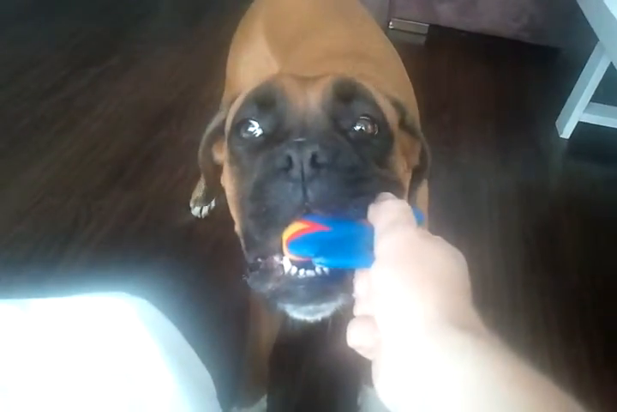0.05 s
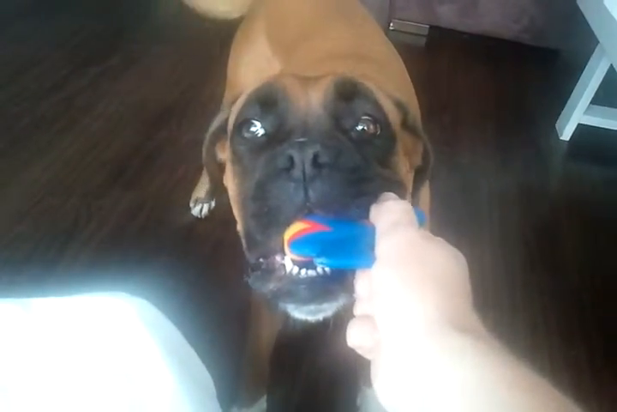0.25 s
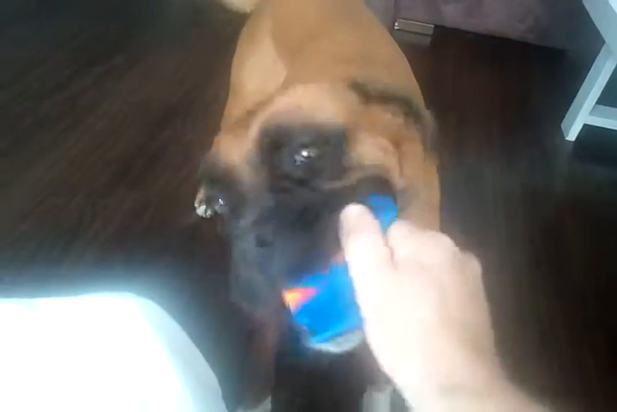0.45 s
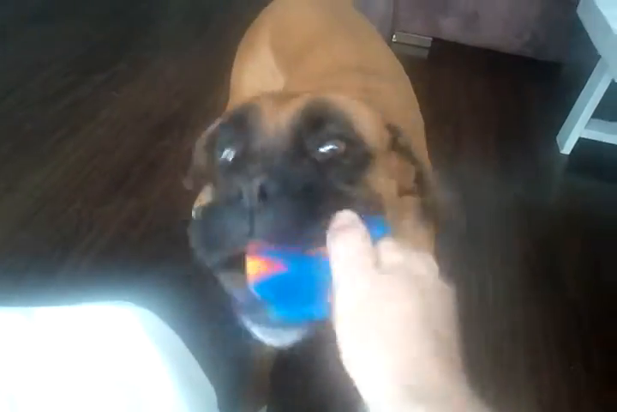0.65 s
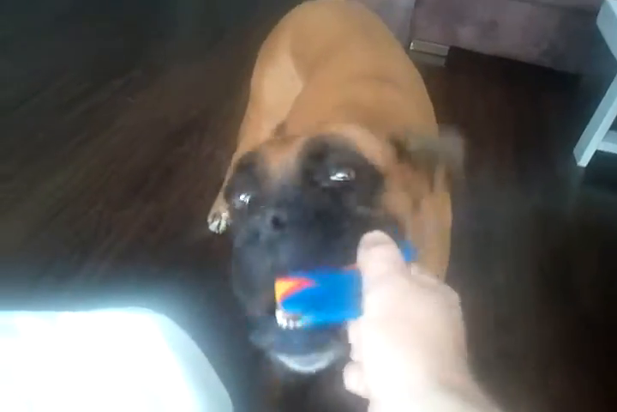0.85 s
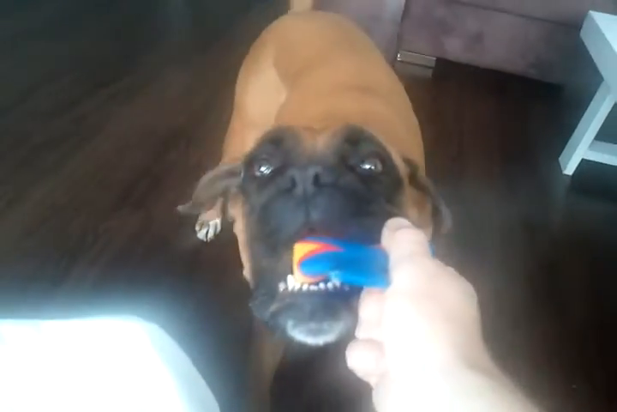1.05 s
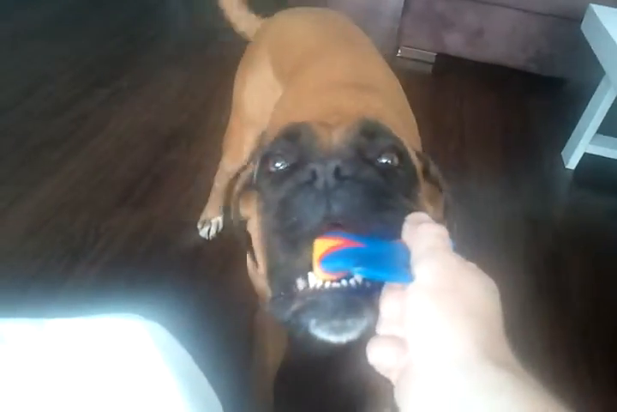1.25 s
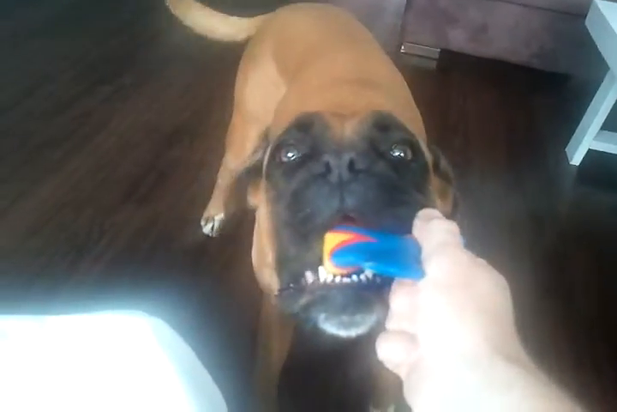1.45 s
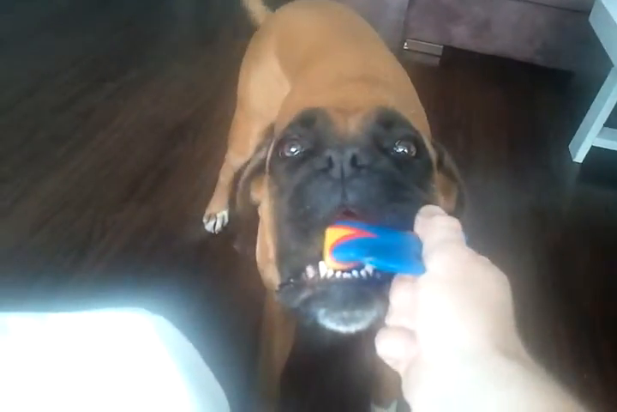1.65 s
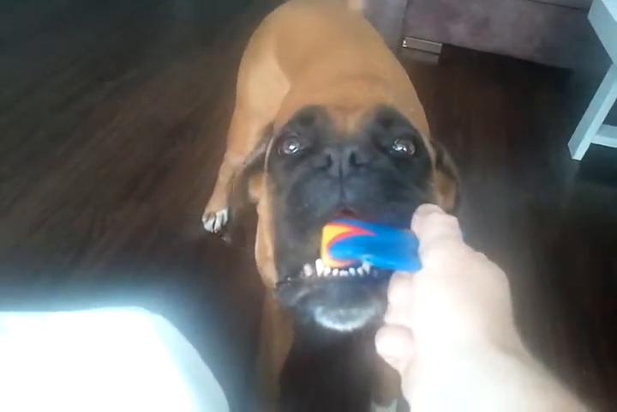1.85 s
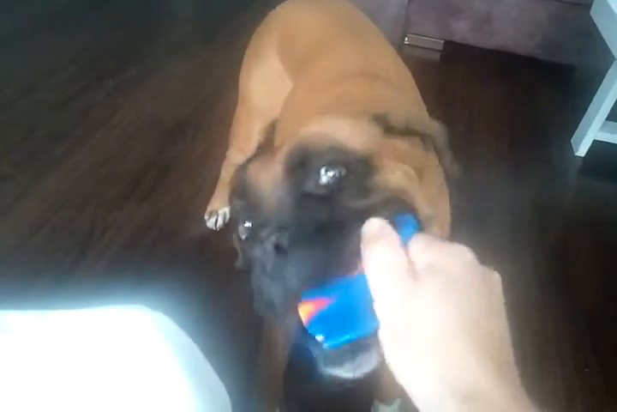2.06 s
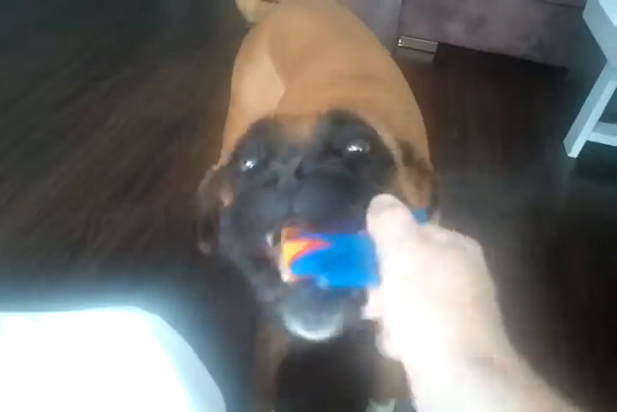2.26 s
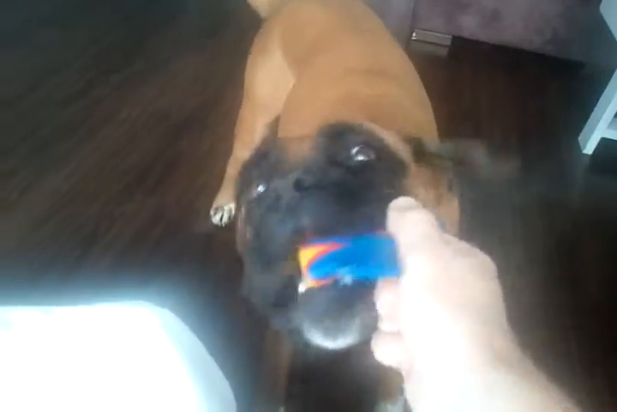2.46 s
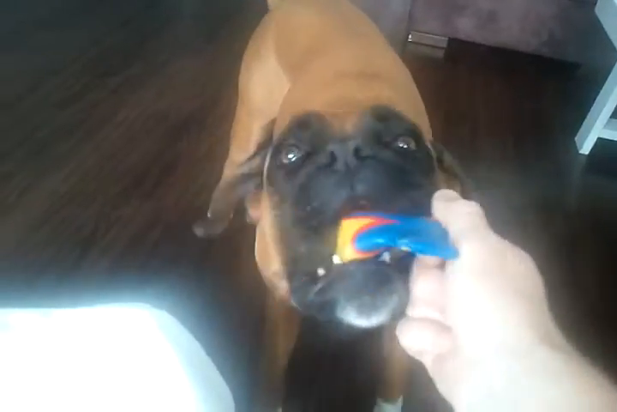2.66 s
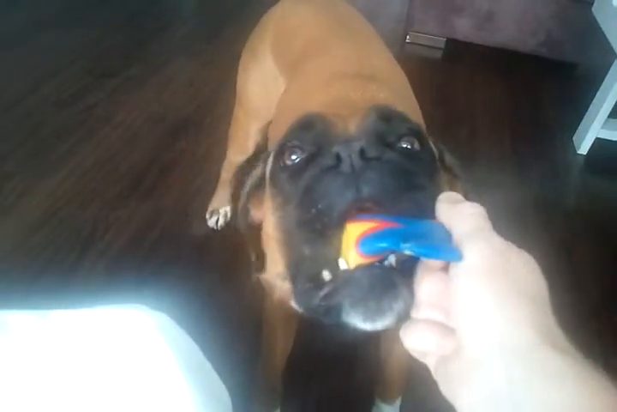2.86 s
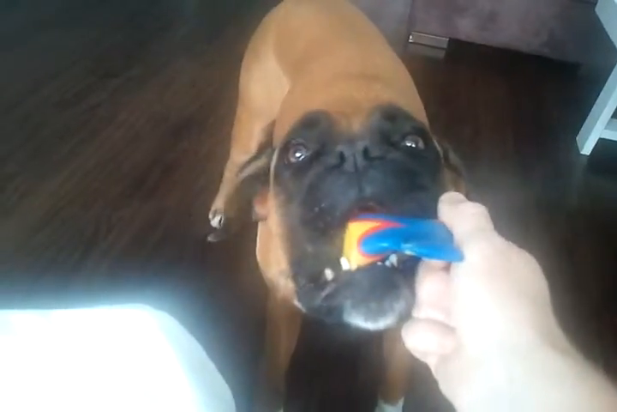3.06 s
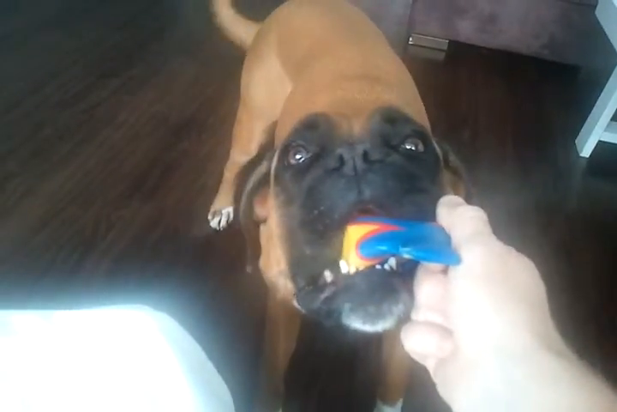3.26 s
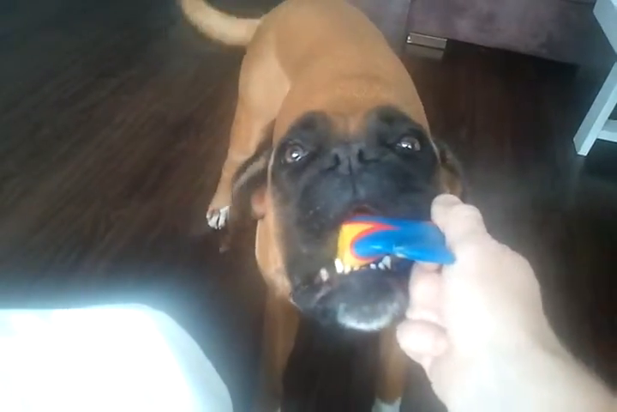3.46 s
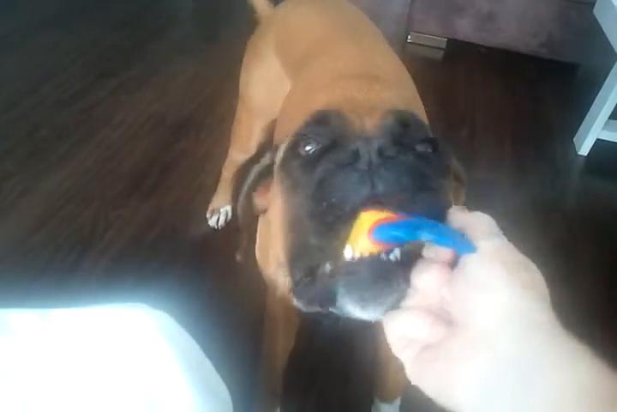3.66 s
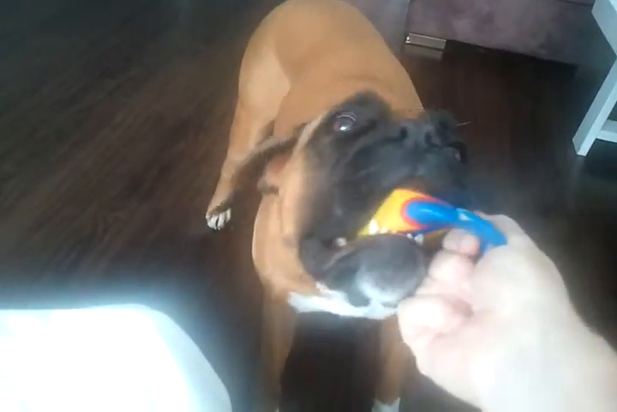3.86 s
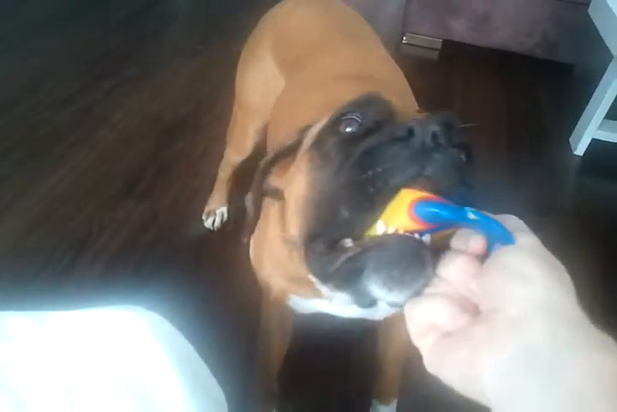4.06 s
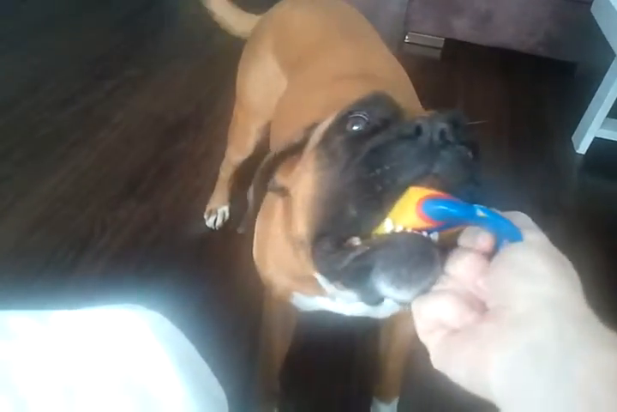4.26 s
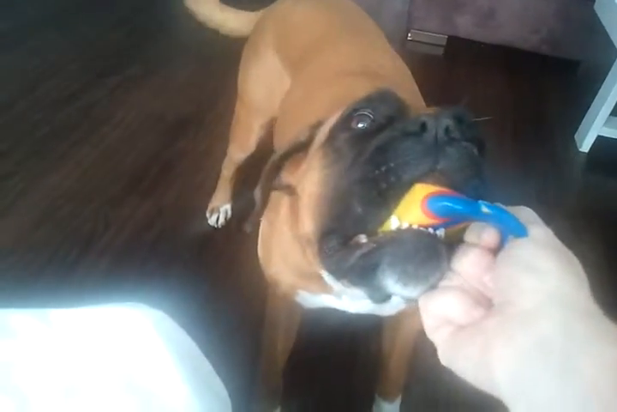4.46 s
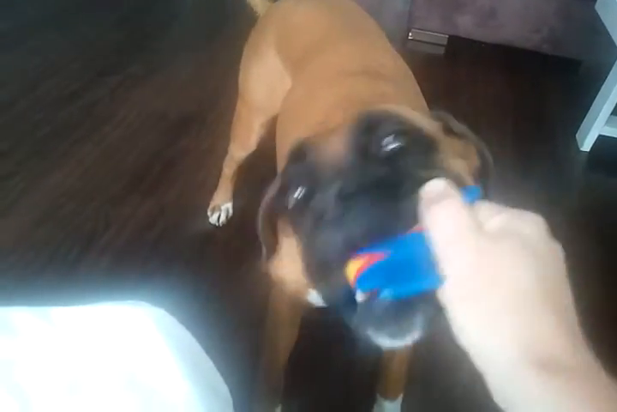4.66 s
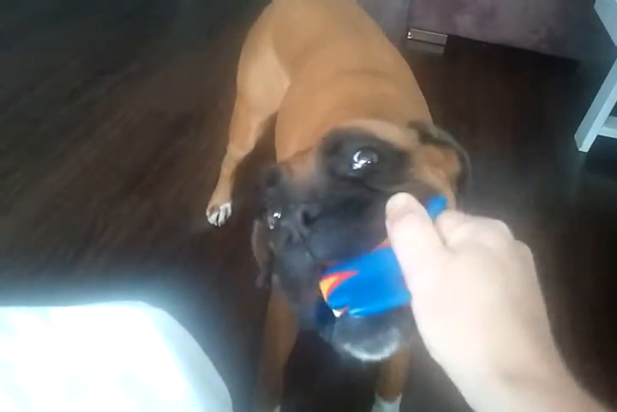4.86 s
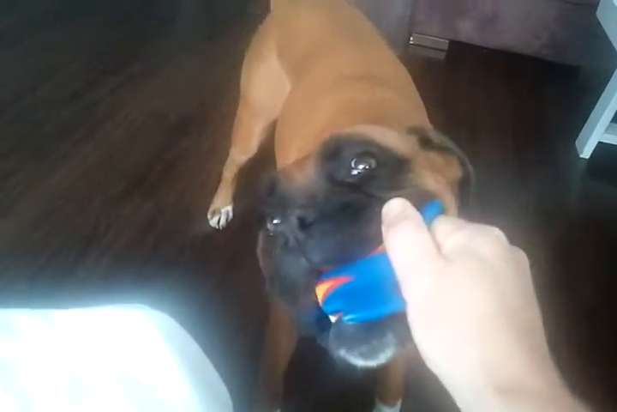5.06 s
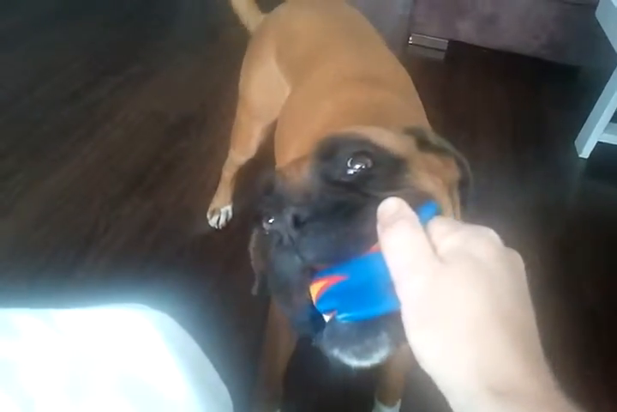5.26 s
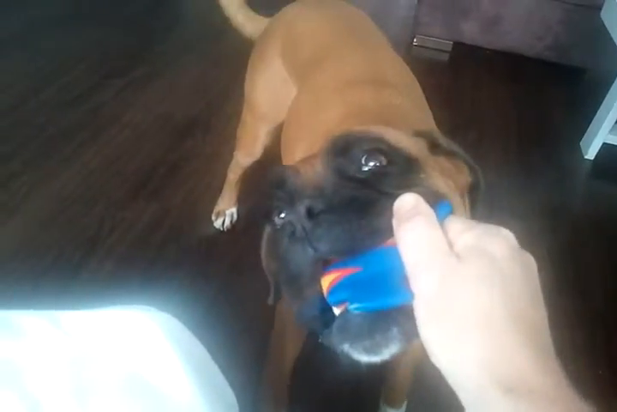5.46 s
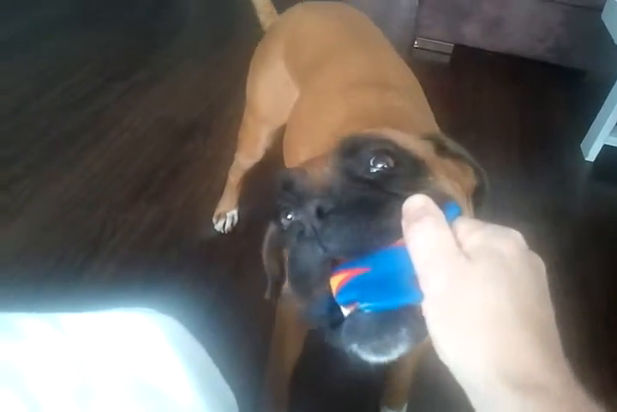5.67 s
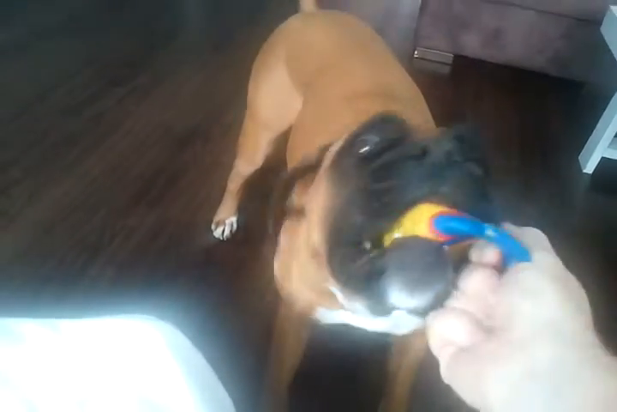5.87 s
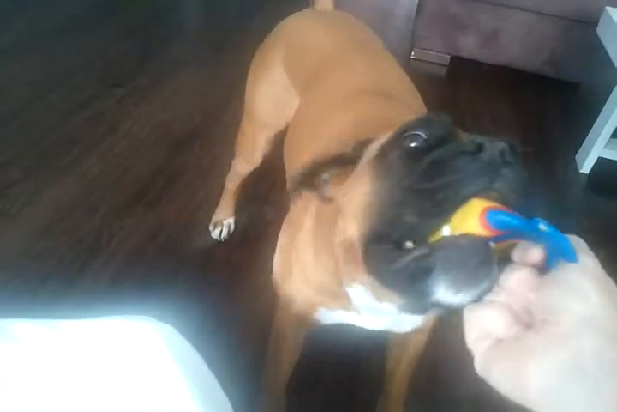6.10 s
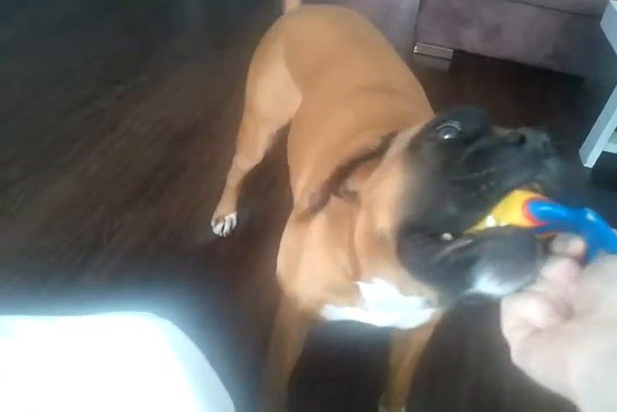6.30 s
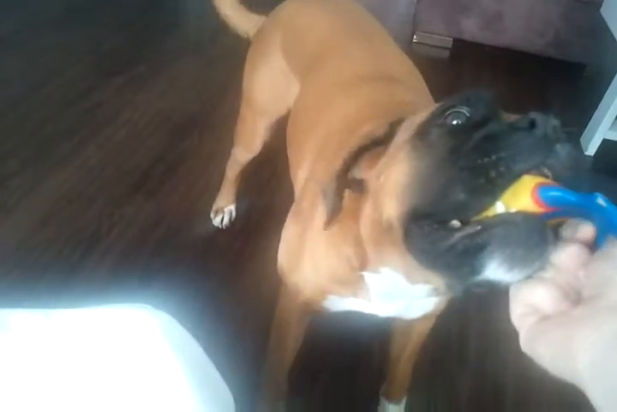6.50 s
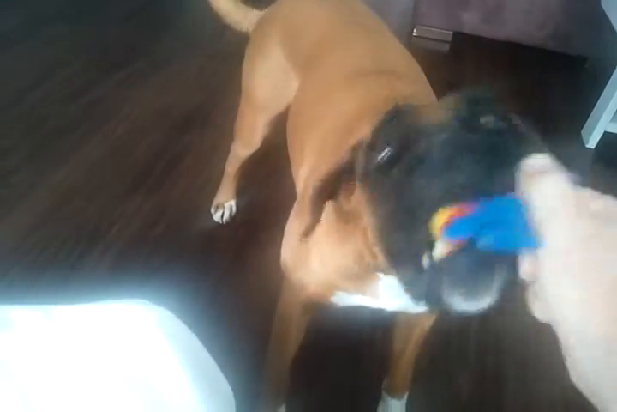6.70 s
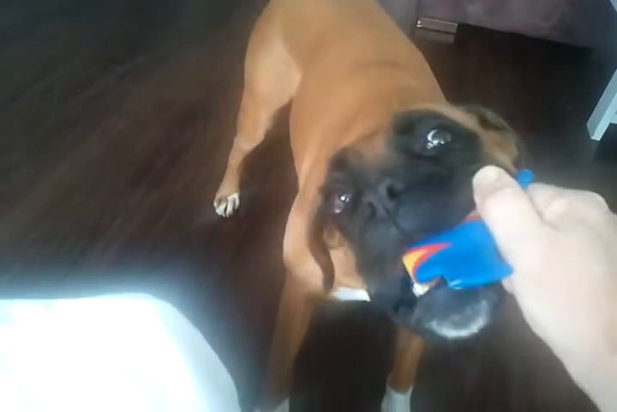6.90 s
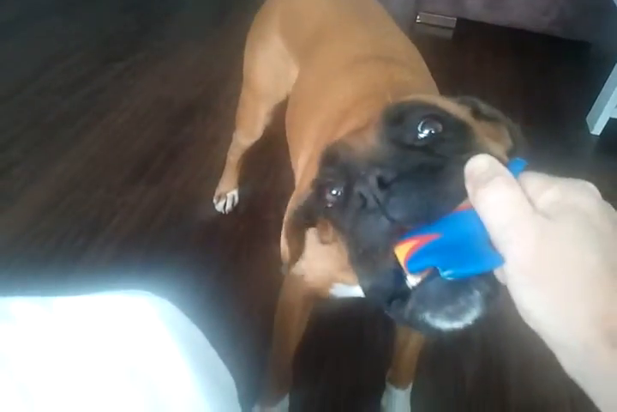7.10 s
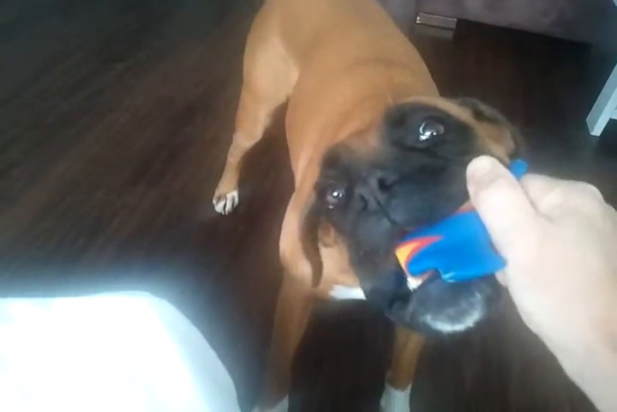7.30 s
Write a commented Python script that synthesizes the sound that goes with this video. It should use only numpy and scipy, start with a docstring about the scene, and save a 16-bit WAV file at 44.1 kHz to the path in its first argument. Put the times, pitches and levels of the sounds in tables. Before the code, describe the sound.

Close to a small microphone in a hard-floored living room, a dog chews a rubber squeaky toy. A quick run of raspy, nasal squeaks opens, then a pair near two seconds, single bites before four and five, one very short at about six, and a longer wavering squeak near the end. Tiny tooth clicks and dull jaw thuds sit between; the room rings briefly over steady faint hiss.

```python
"""Dog biting a squeaky toy

A dog bites a rubber squeaky toy close to a small microphone in a living room with a hard floor.
Each bite drives air past a beating reed: a stack of harmonics whose pitch and level follow drawn curves.
The hollow of the toy boosts the octave when it comes near the hollow's own pitch.
Teeth tick and jaws push dully as filtered noise, the room answers with fading noise,
and a steady hiss with two faint tones lies below."""
import sys
import numpy as np
from scipy import signal
from scipy.fft import rfft, irfft
from scipy.io import wavfile
from scipy.ndimage import uniform_filter1d

SR = 44100
rng = np.random.default_rng(int(sys.argv[2]) if len(sys.argv) > 2 else 0)


def master_out(mix):
    """Clip the mix to full scale and print it as 16-bit PCM to the path in sys.argv[1]."""
    frames = np.transpose(np.atleast_2d(mix))
    ceiling = np.clip(frames, -1, 1)
    pcm = np.round(ceiling * 32767).astype(np.int16)
    wavfile.write(sys.argv[1], SR, pcm)


N = 323694   # length of the scene in samples
SAMPLING_HZ = 16000   # the low sampling rate that the sound imitates


def from_db(db):
    """Turn decibels into a gain."""
    return 10 ** (np.asarray(db) / 20)


def rms_one(x):
    """Scale a sound to an rms (average strength) of 1."""
    return x / np.sqrt(np.mean(x ** 2) + 1e-20)


def at_hz(points, hz):
    """Read a curve of (frequency, value) points, with frequency on a log axis."""
    points = np.array(points)
    return np.interp(np.log(hz), np.log(points[:, 0]), points[:, 1])


def band(x, lo_hz, hi_hz, order=2):
    """Keep only the frequencies between two limits (Butterworth band-pass)."""
    limits = [lo_hz, min(hi_hz, .45 * SR)]
    return signal.sosfilt(signal.butter(order, limits, "band", fs=SR, output="sos"), x)


def slow(rows, length, size):
    """Rows of smooth random movement, spread 1: noise averaged twice over `size` samples."""
    once = uniform_filter1d(rng.standard_normal((rows, length)), size=size)
    return rms_one(uniform_filter1d(once, size=size))


def add(out, s, piece):
    """Mix a short sound in at s seconds."""
    i = round(s * SR)
    out[..., i:i + piece.shape[-1]] += piece


# shape of the hiss, only relative levels count: (frequency [Hz], level [dB per Hz])
HISS_SHAPE = [(15, -52), (25, -24.5), (190, -5), (487, -5.5), (751, -8), (957, -8), (1310, -11),
              (1480, -11.5), (6130, -17), (8000, -30.5), (10400, -60), (17600, -120)]
HISS_DB = -58   # rms
# faint steady tones: (frequency [Hz], rms level [dB])
STEADY_TONES = [(1293, -68.5), (2180, -82)]


def background():
    """Noise shaped in frequency makes a smooth hiss; plain sines make the faint steady tones."""
    hz = np.maximum(np.arange(N // 2 + 1) * SR / N, 1)
    spectrum = rfft(rng.standard_normal(N)) * from_db(at_hz(HISS_SHAPE, hz))
    hiss = from_db(HISS_DB) * rms_one(irfft(spectrum, N))
    t = np.arange(N) / SR
    tones = 0
    for tone_hz, level_db in STEADY_TONES:
        tones = tones + np.sqrt(2) * from_db(level_db) * np.sin(2 * np.pi * tone_hz * t)
    return hiss + tones


SPLIT_HZ = 4200   # middle partials lie below, top partials above


def partials(colour_db, hz, mid, top):
    """Heights of the upper partials: the colour shares out the level of the middle and the top group."""
    colour = from_db(colour_db) * (hz < SAMPLING_HZ / 2)
    high = np.clip((hz - SPLIT_HZ) / 400 + .5, 0, 1)   # soft changeover, 400 Hz wide
    heights = 0
    for sizes, level in ((colour * (1 - high), mid), (colour * high, top)):
        heights = heights + level * sizes / np.sqrt(np.sum(sizes ** 2, axis=0))
    return heights


# colour that pipe and jaws give the upper partials: (frequency [Hz], level [dB])
PIPE_COLOUR = [(1500, -9.5), (1900, -7.5), (2500, -6.5), (3200, -5.5), (3800, -9.5), (4500, -13),
               (5300, -9), (5900, -7.5), (6600, -3.5), (7200, -8.5), (7700, -22.5)]
GRIP_WIDTH_HZ, SHIFTING_DB = 190, 4   # width of the grip's peaks and dips; wavering of the colour
GRIP_IN_ROOM = 0.42   # the grip beams its colour forward: share of it (in dB) that the walls hear
BREATHY_DB = -27   # air noise against the stronger of the middle and top groups
WOBBLE = .0014   # pitch jitter, as a share of the pitch
LOW_SHIFTING_DB = 1.5   # fundamental and octave waver in level
HOLLOW_WIDTH_HZ, HOLLOW_FOLLOWS = 100, .15   # the hollow rings on as the drive sinks (dB per dB of drive)
LOW_FOLLOWS, TOP_FOLLOWS = 0.59, 1.09   # fundamental and top partials, dB per dB of drive
LOW_DB_PER_OCTAVE = 13.5   # the fundamental thins as the pitch sags


def puff(rows, balance, grip):
    """A beating reed, its upper partials coloured by pipe and grip; rows: to the microphone, to the walls."""
    s, pitch_hz, level_db = np.transpose(rows)
    *balance_db, hollow_hz, octave_swell_db, top_swell_db = balance
    t = np.arange(s[0], s[-1], 1 / SR)
    late = t - t.mean()   # seconds from the middle of the puff
    hz = uniform_filter1d(np.interp(t, s, pitch_hz), size=90)
    mid = from_db(uniform_filter1d(np.interp(t, s, level_db), size=60))
    peak = from_db(level_db.max())
    drive = mid / peak
    low_gain, octave_gain, hollow_gain, top_gain = from_db(balance_db) * peak

    # levels of the fundamental, the octave and the top partials
    thinning = from_db(LOW_DB_PER_OCTAVE * np.log2(hz / hz.max()))
    low = low_gain * drive ** LOW_FOLLOWS * thinning
    ringing = np.exp(-((2 * hz - hollow_hz) / HOLLOW_WIDTH_HZ) ** 2)
    octave = octave_gain * from_db(octave_swell_db * late) * drive
    octave = octave + hollow_gain * ringing * drive ** HOLLOW_FOLLOWS
    top = top_gain * from_db(top_swell_db * late) * drive ** TOP_FOLLOWS

    # upper partials, each starting at a random point of its cycle
    wobble = WOBBLE * slow(1, len(t), size=60)[0]
    phase = 2 * np.pi * np.cumsum(hz * (1 + wobble)) / SR
    k = np.arange(3, 18)[:, None]   # partial numbers
    shifting_db = SHIFTING_DB * slow(len(k), len(t), size=500)   # the toy never keeps still
    pipe_db = at_hz(PIPE_COLOUR, k * hz) + shifting_db
    grip_db = 0
    for peak_hz, peak_db in grip:
        grip_db = grip_db + peak_db * np.exp(-((k * hz - peak_hz) / GRIP_WIDTH_HZ) ** 2)
    waves = np.cos(k * phase - rng.uniform(0, 2 * np.pi, k.shape))
    upper = []
    for share in (1, GRIP_IN_ROOM):
        heights = partials(pipe_db + share * grip_db, k * hz, mid, top)
        upper.append(np.sum(heights * waves, axis=0))

    flutter = from_db(LOW_SHIFTING_DB * slow(2, len(t), size=250))
    fundamental = flutter[0] * low * np.cos(phase)
    tone = fundamental + flutter[1] * octave * np.cos(2 * phase) + np.array(upper)
    air = rms_one(band(rng.standard_normal(len(t)), 1500, 7000))
    air = air * from_db(BREATHY_DB) * np.maximum(mid, top)
    fade = np.clip(np.minimum((t - s[0]) / 0.00077, (s[-1] - t) / 0.0063), 0, 1)   # times in s
    return fade * (np.sqrt(2) * tone + air)


# one curve for each puff of air: (time [s], reed pitch [Hz], level of the middle partials [dB])
SQUEAK_CURVES = [
    [(.471, 606, -42), (.478, 680, -24), (.49, 725.4, -25), (.51, 732.6, -21), (.522, 788.4, -22),
     (.532, 788.6, -24.5), (.54, 735, -24.5), (.55, 817, -23.5), (.56, 747, -24.5), (.57, 647, -33),
     (.592, 515, -46)],
    [(.622, 643, -52), (.64, 672, -33), (.65, 646, -37), (.66, 490, -39), (.67, 485, -50)],
    [(.703, 569, -36.5), (.715, 610.6, -28.5), (.74, 587.7, -32.5), (.752, 598, -34), (.765, 646.5, -23),
     (.78, 619, -28.5), (.795, 637.6, -29), (.807, 619, -37), (.82, 482.6, -44.5), (.835, 557, -41.5),
     (.848, 532, -46)],
    [(.872, 609, -47), (.89, 578, -43.5), (.9, 564, -44.5), (.912, 503, -56), (.93, 446, -55)],
    [(.988, 576, -56), (1.0, 627, -24.5), (1.01, 580, -36), (1.022, 495, -44.5)],
    [(2.031, 601, -45.5), (2.037, 686, -23), (2.052, 753.4, -20.5), (2.062, 736.7, -17.5),
     (2.07, 697, -30.5), (2.08, 641.6, -23.5), (2.095, 646, -27), (2.108, 599.6, -32.5),
     (2.12, 641.5, -25.5), (2.13, 632, -37), (2.152, 510, -49)],
    [(2.269, 652, -45), (2.273, 685, -24.5), (2.285, 751, -25), (2.3, 734.4, -28), (2.312, 700.3, -25.5),
     (2.322, 711.6, -26), (2.332, 670, -26), (2.345, 590, -37.5), (2.357, 470, -49)],
    [(3.768, 673, -43), (3.776, 731, -19), (3.79, 801, -21.5), (3.8, 784.7, -20.5), (3.81, 728.5, -20),
     (3.82, 660, -24), (3.835, 652.6, -21), (3.85, 593, -31.5), (3.862, 549, -41.5), (3.877, 448, -46)],
    [(4.686, 479, -51), (4.692, 584, -29.5), (4.698, 633.4, -21), (4.708, 650.8, -20.5), (4.72, 629, -25.5),
     (4.73, 579, -38), (4.74, 503, -51), (4.748, 507, -38)],
    [(4.764, 449, -45.5), (4.775, 481, -58), (4.785, 438, -49), (4.802, 438, -51)],
    [(5.909, 530, -45.5), (5.915, 645, -26), (5.922, 655, -19.5), (5.93, 643, -22), (5.94, 617, -28),
     (5.952, 585, -34.5), (5.965, 476, -50), (5.974, 430, -45)],
    [(6.036, 516, -54), (6.042, 473, -66), (6.056, 424, -69)],
    [(6.737, 400, -60), (6.745, 552.5, -31), (6.752, 587.5, -26), (6.76, 583.5, -29.5), (6.77, 558.7, -31),
     (6.782, 602.3, -25.5), (6.795, 586.7, -30.5), (6.83, 583.2, -30.5), (6.842, 588, -35.5),
     (6.855, 553.6, -31), (6.865, 575, -48.5), (6.882, 458, -43)],
]
# balance of each puff at its loudest, against the middle partials, and its drift as the jaws close:
# (fundamental [dB], octave [dB], octave ringing in the hollow [dB], top partials [dB],
#  hollow pitch [Hz], octave swell [dB per s], top swell [dB per s])
PUFF_BALANCES = [(-2, -17, -7.5, 9.5, 1090, 219.5, 2.5), (-16, -4.5, 1.5, -10, 990, 2, 0),
                 (-5, -17, -8.5, 4.5, 1030, 150, 51), (-14, 6, 5.5, -19, 1000, 45, -50),
                 (-6.5, -24, 3, 0, 910, 0, -4), (-6, -12, -9.5, 8.5, 1090, 60.5, -30),
                 (-1, -11.5, 5, 7, 900, 43, 33), (-2.5, -16, -11.5, 4, 895, -60, -1.5),
                 (-8, -29.5, -14, 1.5, 1005, -1.5, 99), (-1.5, -9, 12.5, 2, 1010, 0, 0),
                 (-9, -27, -13.5, -0.5, 977, 2, 48), (-2, 4, 7, -6, 940, 3, 2),
                 (-6, -30, -4, -3, 976, 62, 67)]
# each puff leaves through another grip of jaws and hand, with narrow peaks and dips:
# (frequency [Hz], level [dB])
PUFF_GRIPS = [
    [(2030, 7), (3600, 20.5), (3950, 1), (5100, -14), (5500, -13.5)],
    [(2700, 32)],
    [(2500, -6), (3100, 9), (3750, -5), (4300, -10), (6300, 10), (7200, -27)],
    [(2300, 8), (3450, 15)],
    [(1880, 6), (2500, -1), (3100, 11), (4100, -18), (7200, 9)],
    [(2030, -1), (3750, 2), (4450, 2), (5100, -11), (7500, -10)],
    [(2040, 0), (2250, -2), (3500, 7), (4300, -14), (4900, -0.5), (7500, 9)],
    [(2200, 0.5), (3920, -8), (6660, 1.5), (5200, -1.5), (5930, -10.5), (7800, -2.5)],
    [(2550, 16), (6400, 18), (7000, -16.5)],
    [(3200, 2)],
    [(2550, 4.5), (3250, 0.5), (3880, -20.5), (4550, 1.5), (5150, 0), (5830, -6.5), (6500, 1.5)],
    [(2600, 2)],
    [(1760, -5.5), (2350, 12), (3500, 9), (4100, -7.5), (4700, 8), (7200, 3)],
]


def squeaks():
    """Each puff of air sounds the reed with its own curve, balance and grip."""
    out = np.zeros((2, N))
    for rows, balance, grip in zip(SQUEAK_CURVES, PUFF_BALANCES, PUFF_GRIPS):
        add(out, rows[0][0], puff(rows, balance, grip))
    return out


# how long the room takes to fade by 60 dB: (frequency [Hz], fade time [s])
ROOM_FADE = [(300, 0.29), (800, 0.7), (2000, 0.7), (5500, 0.58), (8000, 0.58)]
ROOM_DB, ROOM_RISE_S = -12.5, 0.007
EARLY_DB, EARLY_S = 13, 0.031   # nearby floor and furniture answer first and louder
ROOM_TREBLE_HZ, ROOM_TREBLE_DB = 6717, 2   # the top leaves sideways: from here up, a layer added to the tail


def room(x):
    """Dense reflections: noise that builds up fast and dies band by band."""
    t = np.arange(SR) / SR
    edges = 150 * 2 ** np.arange(0, 6, .5)   # half-octave bands, in Hz
    tail = 0
    for lo, hi in zip(edges, edges[1:]):
        fall = from_db(-60 * t / at_hz(ROOM_FADE, np.sqrt(lo * hi)))
        tail = tail + band(rng.standard_normal(SR), lo, hi) * fall
    tail = tail + from_db(ROOM_TREBLE_DB) * band(tail, ROOM_TREBLE_HZ, SAMPLING_HZ / 2)
    rise = 1 - np.exp(-t / ROOM_RISE_S)
    early = from_db(EARLY_DB * np.exp(-t / EARLY_S))
    tail = tail * rise * early
    tail = tail / np.sqrt(np.sum(tail ** 2))   # total energy 1
    return from_db(ROOM_DB) * signal.fftconvolve(x, tail)[:N]


# jaws closing on the rubber: (time [s], rumble level at the crest [dB], time to the crest [s])
JAW_PUSHES = [(.53, -54, .035), (.95, -57, .03), (2.04, -59, .05), (3.76, -59, .045), (4.74, -60, .05)]


def jaw_pushes():
    """A dull push: low noise that swells to a crest and dies away, cut off after 0.2 s."""
    out, t = np.zeros(N), np.arange(round(.2 * SR)) / SR
    for s, level_db, crest_s in JAW_PUSHES:
        rumble = rms_one(band(rng.standard_normal(len(t)), 150, 430))
        swell = t / crest_s * np.exp(1 - t / crest_s)
        add(out, s, from_db(level_db) * rumble * swell)
    return out


# teeth and rubber: (time [s], peak level [dB], ringing pitch [Hz], spread [pitch ratio], decay [s])
TEETH_TICKS = [(.966, -37, 600, 2.0, .002), (1.546, -50, 6800, 1.3, .004), (2.537, -30, 2900, 1.25, .002),
               (2.588, -41, 600, 1.6, .025), (3.758, -40, 700, 2.0, .002), (4.902, -33, 3100, 1.25, .003),
               (5.876, -38, 700, 1.9, .002), (6.039, -28, 2400, 1.6, .0015)]


def teeth_ticks():
    """One sharp snap and a brief crackle, sent through a band-pass that rings around one pitch."""
    out, t = np.zeros(N), np.arange(round(.2 * SR)) / SR
    for s, peak_db, hz, spread, decay_s in TEETH_TICKS:
        crackle = rng.standard_normal(len(t)) / 2
        snap = (10 * (t == 0) + crackle) * np.exp(-t / decay_s)
        tick = band(snap, hz / spread, hz * spread, order=3)
        add(out, s, from_db(peak_db) * tick / np.abs(tick).max())
    return out


def scene():
    """Toy, jaws and teeth, with the room's answer, over the background."""
    direct, to_walls = squeaks() + jaw_pushes() + teeth_ticks()
    return (direct + room(to_walls) + background())[None]


OVERLOAD = .85   # level that the rounded peaks cannot pass
LOW_CUT_HZ, BAND_HZ, CUTOFF_HZ = 63, 7300, 9070
MIRROR_DB = -17.5


def record(dry):
    """Like a low sampling rate: the top rolls off and a faint mirror of it appears above half that rate."""
    dry = OVERLOAD * np.tanh(dry / OVERLOAD)   # the loudest peaks are rounded
    dry = signal.sosfilt(signal.butter(2, LOW_CUT_HZ, "high", fs=SR, output="sos"), dry)   # little bass passes
    narrow = signal.sosfilt(signal.butter(5, BAND_HZ, fs=SR, output="sos"), dry)
    # multiplying by a tone at the sampling rate flips the spectrum around half that rate
    flipped = 2 * dry * np.cos(2 * np.pi * SAMPLING_HZ * np.arange(N) / SR)
    mirror = from_db(MIRROR_DB) * band(flipped, SAMPLING_HZ / 2, CUTOFF_HZ, order=4)
    steep = signal.cheby2(12, 50, CUTOFF_HZ * 1.04, fs=SR, output="sos")
    return signal.sosfilt(steep, narrow + mirror)


dry = scene()
out = record(dry)
master_out(out)
```